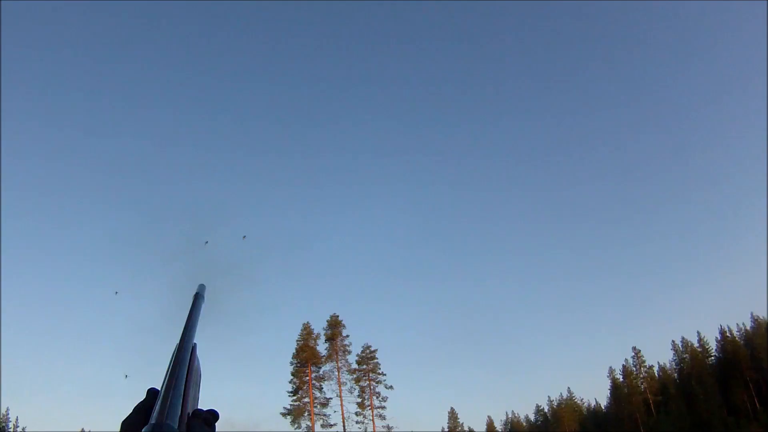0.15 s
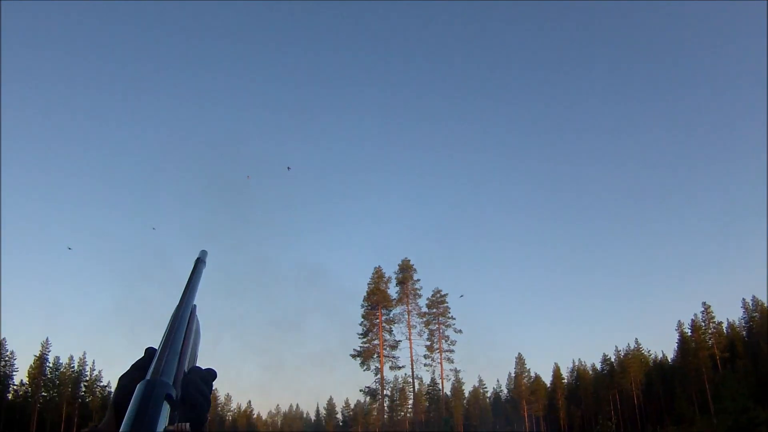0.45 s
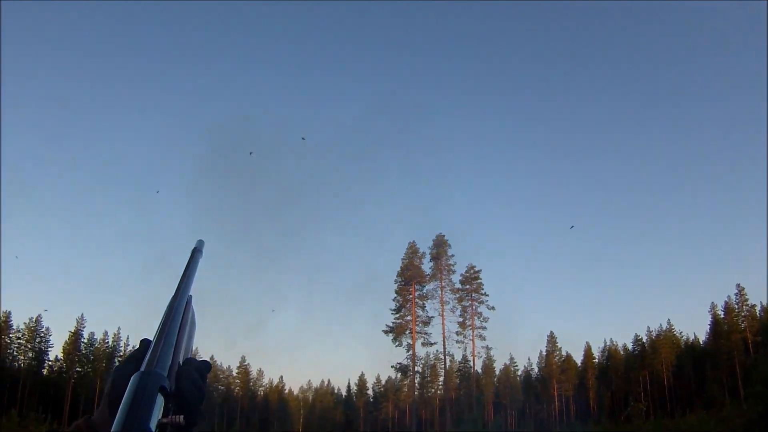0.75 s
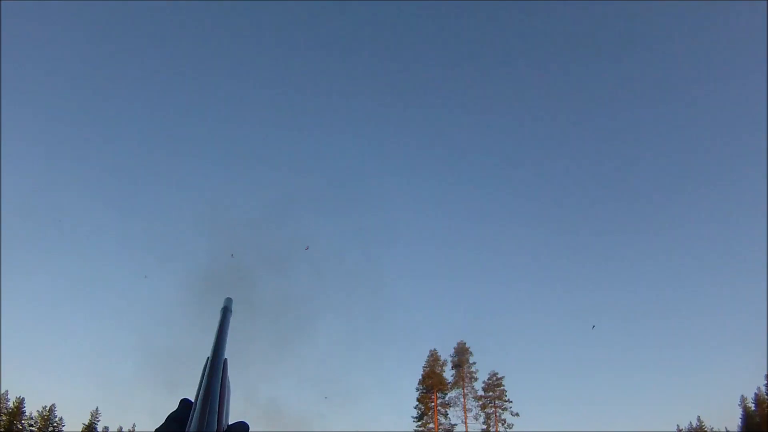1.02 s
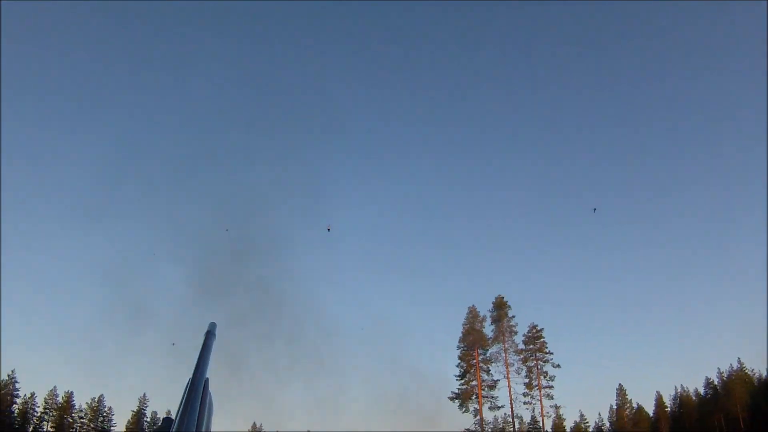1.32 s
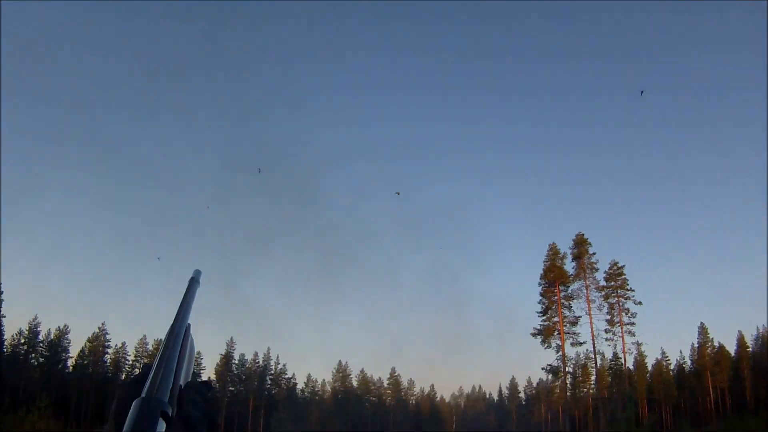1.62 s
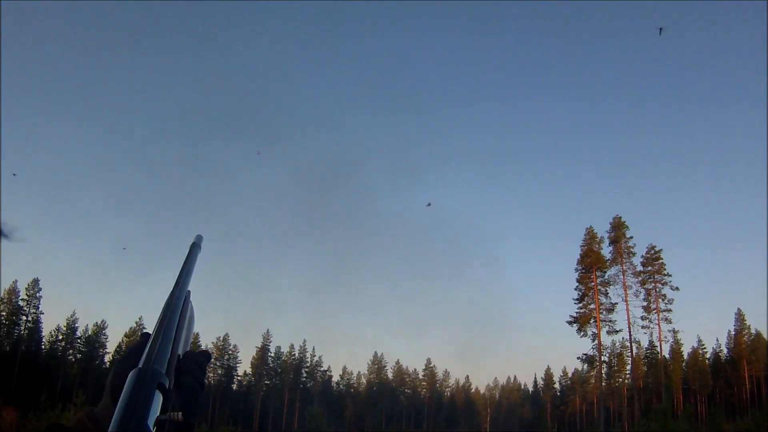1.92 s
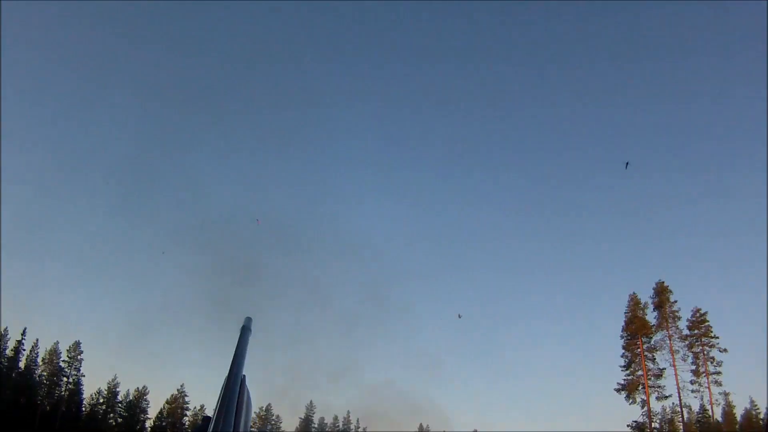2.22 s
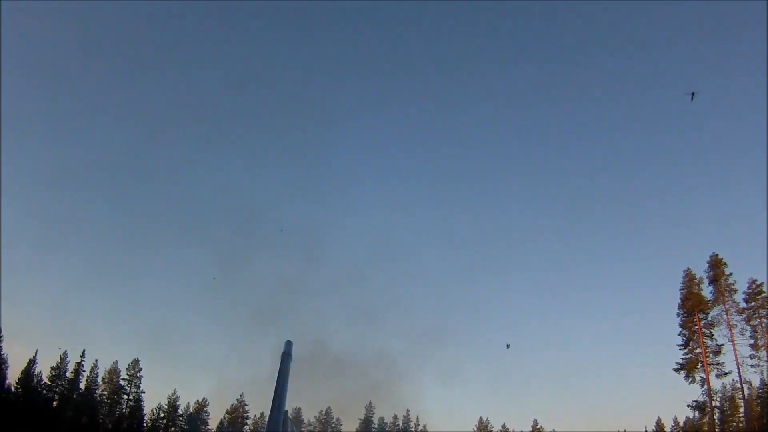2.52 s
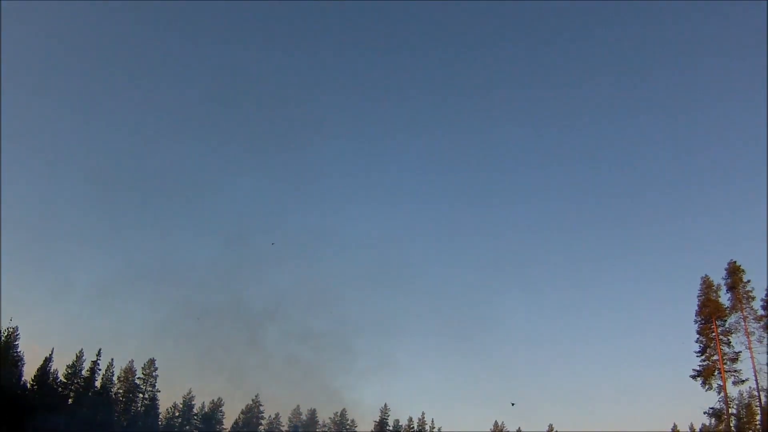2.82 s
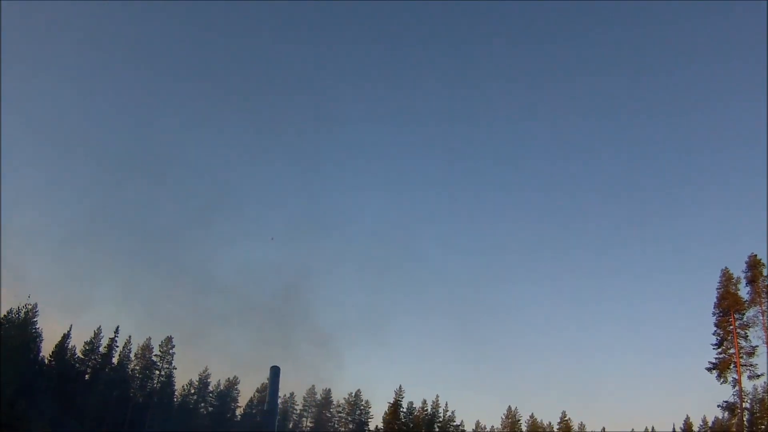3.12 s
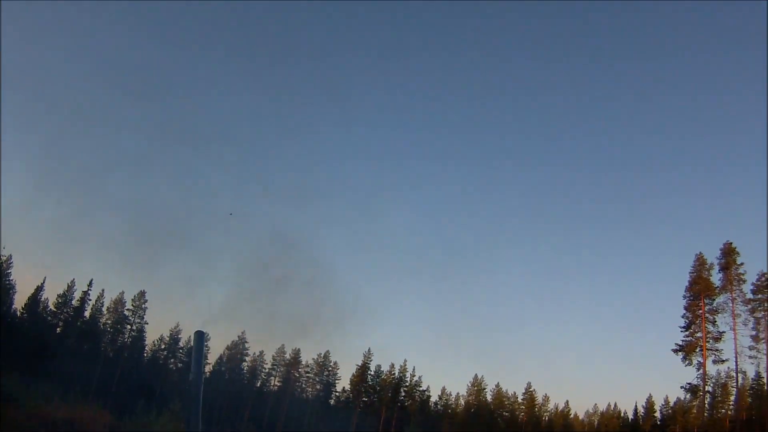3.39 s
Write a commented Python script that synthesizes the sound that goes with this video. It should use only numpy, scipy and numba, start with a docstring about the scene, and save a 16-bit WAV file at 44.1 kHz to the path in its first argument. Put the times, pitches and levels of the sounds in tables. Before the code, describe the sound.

Shotgun blasts outdoors: after brief quiet air and a faint tick, a close, clipped shot cracks at 0.15 seconds. Steel action clacks cluster around 0.4. A second near shot hits at 0.99, with clacks at 1.02 and 1.2; a third at 2.14, then a neighbour's shorter shot at 2.46. Low booms and grainy forest echoes roll and dull to the end; the coarse microphone ducks after each blast.

```python
"""Shotguns in a forest clearing

Four blasts: three from the gun beside the microphone, one from a neighbour's gun, over a bed of quiet air.
Shaped noise makes the muzzle gas, the low boom and the grainy, rolling echo off the tree line.
Decaying sines make the hammer tick before each near shot and the steel clacks of the action around the shots.
Each blast overloads the microphone and pulls its gain down; a coarse sampler mirrors the sound into the treble."""
import sys
import numpy as np
from scipy import signal
from scipy.fft import rfft, irfft
from scipy.io import wavfile
from scipy.ndimage import uniform_filter1d, minimum_filter1d
from numba import njit

SR = 44100
rng = np.random.default_rng(int(sys.argv[2]) if len(sys.argv) > 2 else 0)


def to_wav(sig):
    """Store sig (one row per channel, or 1-D mono) as 16-bit WAV at the path in sys.argv[1].

    Samples outside -1..1 are clipped; the rate is SR.
    """
    pcm = np.clip(np.atleast_2d(sig), -1, 1) * 32767
    pcm = np.round(pcm).astype(np.int16)
    wavfile.write(sys.argv[1], SR, pcm.T)  # frames by channels


N = 156555

# Shots, levels ahead of the gain control: t/s, blast level/dB, blast length/s, echo level/dB,
# head start of the echo/s, hammer tick level/dB, pressure swing level/dB
SHOTS = [(0.1496, 18, 0.01, 1, 0.0043, -18, 7), (0.9853, 24.5, 0.0087, 0.5, 0.00087, -19, 5.5),
         (2.1413, 22.5, 0.0107, 3.5, 0.0036, -19, 9), (2.4615, 22.5, 0.00432, -2.5, 0.14, -70, -3)]

# Spectrum of the quiet air, relative: f/Hz, density/dB per Hz
AIR_SPECTRUM = [(18, -27), (30, -1), (393, -19), (668, -18), (892, -18), (1240, -23), (3370, -30),
                (6000, -36), (7800, -63), (13200, -120)]
AIR_DB = -56

# Clacks of the gun's action: t/s, level/dB, brightness/dB per octave, thud against the shoulder/dB
CLACKS = [(0.107, -45, -7, -60), (0.1785, -0.5, 9, -16), (0.217, -3, -4, -52), (0.243, -4, -3, -32),
          (0.3879, 1, -6.5, -18), (0.3975, 3, -5, -16), (0.4028, 7, -1.5, -24), (0.426, -8.5, -15, -17),
          (0.444, -2, -6.5, -20), (1.016, 4.5, 2, -33), (1.2067, 1.5, 4, -15.5), (1.572, -18.5, -1, -49),
          (2.171, 0.5, 9, -35), (2.263, -8, -5, -36), (2.359, -26, -26, -11.5)]
# Ring of the action's steel, relative: f/Hz, level/dB, t60/s
ACTION_MODES = [(1050, 0, .012), (1650, -2, .01), (2300, -2, .008), (3240, -2, .007), (4200, -2, .006),
                (5070, -4, .005)]
CRACK_DB, CRACK_S, CRACK_SPLIT_HZ = -3.5, 0.0018, 2600
THUD_HZ, THUD_T60_S = 87, 0.18

# Tick of the hammer, relative: f/Hz, level/dB, t60/s
HAMMER_MODES = [(1000, 0, .016), (1350, -8, .01), (2900, -8, .004), (3700, -11, .004), (5000, -16, .003)]
HAMMER_LEAD_S = .0062
# Spectrum of the muzzle gas, relative: f/Hz, density/dB per Hz
GAS_SPECTRUM = [(240, -25), (400, -1), (687, -1.5), (1170, -6.5), (1590, -6.5), (2390, -0.5), (2950, -13.5),
                (3560, -7), (4020, -7), (4850, -13.5), (5600, -0.5), (7280, -87), (12300, -120)]
# Ring of the muzzle pulse, relative to the blast: f/Hz, level/dB, t60/s
PUSH_MODES = [(237.5, -3, 0.052), (1079, 1.5, 0.056)]
# Suction after the blast, on top of the shot's swing level: f/Hz, level/dB, t60/s
SWING_MODES = [(95.5, 9, 0.032)]
SWING_LEAD_S = .0008  # ahead of the end of the blast
BLAST_RISE_S, BLAST_START_DB, BLAST_FALL_S = .0035, -32, .0006

BOOM_HZ, BOOM_WIDTH_HZ = 89, 40
RUMBLE_HZ, RUMBLE_DB = 111, 0  # low-pass edge; level relative to the boom band
BOOM_DB, BOOM_T60_S = -26, 0.87  # relative to the shot's swing level
BOOM_LATE_DB, BOOM_LATE_T60_S = -47, 3.05  # relative to the shot's echo level

# Echo of one shot, relative to its echo level: delay/s, level/dB, brightness/dB per octave around 500 Hz
ECHO = [(0, -9.5, 7.5), (0.013, -9, 9.5), (0.034, -5, 1.5), (0.047, -33.5, 7.5), (0.164, -43.5, 8.5),
        (0.169, -17.5, 2.5), (0.199, -18.5, 3), (0.259, -13, 1.5), (.31, -17, 0.5), (.38, -21, 0.3),
        (.5, -20.5, -1.5), (0.701, -25, -1.73), (0.998, -26, -3.5), (1.5, -28, -6), (3.5, -97, -32)]
# Spectrum of the forest's answer, relative: f/Hz, density/dB per Hz
FOREST_SPECTRUM = [(88, -62.5), (150, -27.5), (222, -18.5), (279, -13), (361, -4), (569, -2), (758, -1),
                   (1120, -1.5), (1450, -7.5), (2120, -11), (4010, -22), (5600, -26), (7280, -68.5),
                   (12300, -120)]
TREE_LINE_S, ECHO_BUILD_S = .165, .008
AIR_LOSS_DB_PER_S = 0.03  # at 1 kHz, growing with the square of the frequency
ROLL_DB, ROLL_PER_S = 1.1, 12
TRUNKS_PER_S, TRUNK_S = 160, 0.0033
TRUNK_SHARE, SMOOTH_AFTER_S = 0.44, 1  # grain as the tree line answers, and the time it takes to smooth out

DUCK_DB_PER_S, RECOVER_DB_PER_S, DUCK_ABOVE = 2492, 74, 1
MIC_LOW_HZ, SAMPLER_EDGE_HZ, TOP_HZ = 49.5, 5610, 15500


def undb(db):
    """Amplitude factor from dB."""
    return 10 ** (np.asarray(db, float) / 20)


def unit(x):
    """Scales x to rms 1."""
    return x / np.sqrt(np.mean(x ** 2))


def shape(table, hz):
    """Gain at each frequency, drawn between the table's points on a log frequency axis."""
    f, db = np.array(table, float).T
    return undb(np.interp(np.log(np.maximum(hz, 1)), np.log(f), db, left=-60, right=-60))


def colour(x, table):
    """Filters x by the table's spectrum and scales it to rms 1."""
    hz = np.arange(len(x) // 2 + 1) * SR / len(x)
    return unit(irfft(rfft(x) * shape(table, hz), len(x)))


def lowpass(x, order, hz):
    """Keeps the sound below hz."""
    return signal.sosfilt(signal.butter(order, hz, fs=SR, output="sos"), x)


def ring(modes, t):
    """Decaying sines after a blow at t = 0; silent before it."""
    u = np.maximum(t, 0)
    out = 0
    for hz, db, t60 in modes:
        decay = np.exp(-np.log(1000) * u / max(t60, .002))
        out = out + undb(db) * np.sin(2 * np.pi * hz * u) * decay
    return (t > 0) * out


def walk(rate):
    """Random levels, one every 1 / rate s, with a glide from each to the next."""
    k = int(SR / rate)
    return uniform_filter1d(np.repeat(rng.standard_normal(N // k + 1), k), k)[:N]


def quiet_air():
    """Steady shaped noise: the air of the clearing."""
    return undb(AIR_DB) * colour(rng.standard_normal(N), AIR_SPECTRUM)


def action(t):
    """Steel parts strike: a crack, the ring of the action and a dull thud through the stock."""
    out, noise = np.zeros(N), rng.standard_normal(N)
    dull = lowpass(noise, 2, CRACK_SPLIT_HZ)
    crisp = noise - dull
    detune = 1 + 0.013 * rng.standard_normal((len(CLACKS), len(ACTION_MODES)))
    for (at, db, bright, thud_db), factors in zip(CLACKS, detune):
        start = int(at * SR)
        s = slice(start, start + SR // 4)
        u = t[s] - at
        # brightness tilts the ring around 2 kHz and the crack around its split
        modes = [(hz * k, level + bright * np.log2(hz / 2000), t60)
                 for (hz, level, t60), k in zip(ACTION_MODES, factors)]
        steel = ring(modes, u) / len(ACTION_MODES)
        swell = np.e * u / CRACK_S * np.exp(-u / CRACK_S)  # peaks at 1 after CRACK_S
        crack = undb(CRACK_DB) * swell * (undb(-bright) * dull[s] + undb(bright) * crisp[s])
        thud = ring([(THUD_HZ, thud_db, THUD_T60_S)], u)
        out[s] += undb(db) * (steel + crack) + thud
    return out


def blasts(t):
    """Turbulent muzzle gas, far beyond full scale, after the tick of the hammer; the pressure then swings low."""
    gas, out = colour(rng.standard_normal(N), GAS_SPECTRUM), 0
    for at, db, length, _, _, tick_db, swing_db in SHOTS:
        u = t - at
        rise = (u > 0) * undb(BLAST_START_DB * np.clip(1 - u / BLAST_RISE_S, 0, 1))
        fall = np.exp(-np.clip(u - length, 0, 1) / BLAST_FALL_S)
        blast = undb(db) * rise * fall * (gas + ring(PUSH_MODES, u))
        tick = undb(tick_db) * ring(HAMMER_MODES, u + HAMMER_LEAD_S)
        swing = undb(swing_db) * ring(SWING_MODES, u - length + SWING_LEAD_S)
        out = out + blast + tick - swing
    return out


def boom(t):
    """Low boom and rumble that roll on after each shot, a quick part and a slow part."""
    edges = [BOOM_HZ - BOOM_WIDTH_HZ / 2, BOOM_HZ + BOOM_WIDTH_HZ / 2]
    band = signal.butter(1, edges, "band", fs=SR, output="sos")
    noise = unit(signal.sosfilt(band, rng.standard_normal(N)))
    noise = noise + undb(RUMBLE_DB) * unit(lowpass(rng.standard_normal(N), 2, RUMBLE_HZ))

    def fade(u, db, t60):
        """Power of a tail that loses 60 dB in t60."""
        return (u > 0) * undb(2 * (db - 60 * np.maximum(u, 0) / t60))

    power = 0
    for at, _, _, echo_db, _, _, swing_db in SHOTS:
        power = power + fade(t - at, BOOM_DB + swing_db, BOOM_T60_S)
        power = power + fade(t - at, BOOM_LATE_DB + echo_db, BOOM_LATE_T60_S)
    return noise * np.sqrt(power)


def trunk_noise(t):
    """Clumps of trunks return short bursts, grainy as the tree line answers, that merge into a wash."""
    chance, size = rng.random((N, 2)).T
    burst = np.exp(-np.arange(SR // 50) / (TRUNK_S * SR))
    clumps = signal.fftconvolve(size * (chance < TRUNKS_PER_S / SR), burst)[:N]
    arrive = [shot[0] + TREE_LINE_S - shot[4] for shot in SHOTS]
    # time since the latest answer; the -1 keeps the noise smooth before the first
    since = t - np.array([-1] + arrive)[np.searchsorted(arrive, t)]
    share = np.clip(TRUNK_SHARE * (1 - since / SMOOTH_AFTER_S), 0, 1)
    power = share * np.abs(clumps) / clumps.mean() + 1 - share
    return np.sqrt(power) * rng.standard_normal(N)


def forest(t):
    """Trunk echoes roll in level; band by band the wash dulls as it comes from farther away."""
    delay, level_db, bright = np.array(ECHO).T
    rolling = colour(trunk_noise(t), FOREST_SPECTRUM) * undb(ROLL_DB * walk(ROLL_PER_S))
    spec = rfft(rolling)
    octave = np.log2(np.maximum(np.arange(len(spec)) * SR / N, 1) / 1000)
    out = 0
    for mid in range(-3, 4):  # overlapping octave bands, 125 Hz to 8 kHz
        band = irfft(spec * np.clip(1 - np.abs(octave - mid), 0, 1), N)
        air_loss_db = AIR_LOSS_DB_PER_S * delay * 2. ** (2 * mid)
        curve_db = level_db + bright * max(mid + 1, -1) - air_loss_db
        power = 0
        for at, _, _, echo_db, head_start, _, _ in SHOTS:
            build = np.clip((t - at) / ECHO_BUILD_S, 0, 1) ** 10
            db = echo_db + np.interp(t - at + head_start, delay, curve_db)
            power = power + build * undb(2 * db)
        out = out + band * np.sqrt(power)
    return out


def scene():
    """Sums the layers as they reach the microphone."""
    t = np.arange(N) / SR
    return (quiet_air() + action(t) + blasts(t) + boom(t) + forest(t))[None]


@njit
def duck(peak, above, down, up):
    """Gain that slides down while the sound overloads and creeps back to 1 afterwards."""
    gain, g = np.empty(len(peak)), 1.
    for i in range(len(peak)):
        g = g * down if peak[i] * g > above else min(g * up, 1.)
        gain[i] = g
    return gain


def record(dry):
    """Gain control and clipping, then a 12 kHz sampler that holds each value: mirrors around 6 and 12 kHz."""
    peak = -minimum_filter1d(-np.abs(dry[0]), size=41, origin=20)  # highest of 41 samples
    down, up = float(undb(-DUCK_DB_PER_S / SR)), float(undb(RECOVER_DB_PER_S / SR))
    gain = duck(peak, 1. * DUCK_ABOVE, down, up)
    x = np.clip(dry[0] * gain, -1, 1)
    x = signal.sosfilt(signal.butter(1, MIC_LOW_HZ, "high", fs=SR, output="sos"), x)
    x = signal.sosfiltfilt(signal.butter(6, SAMPLER_EDGE_HZ, fs=SR, output="sos"), x)
    held = np.repeat(signal.resample_poly(x, 40, 147), 4)  # 12 kHz values held at 48 kHz
    x = signal.resample_poly(held, 147, 160)  # back to SR
    x = np.clip(np.roll(np.resize(x, N), -1), -1, 1)
    return signal.sosfilt(signal.ellip(10, .1, 75, TOP_HZ, fs=SR, output="sos"), x)[None]


dry = scene()
out = record(dry)
to_wav(out)
```